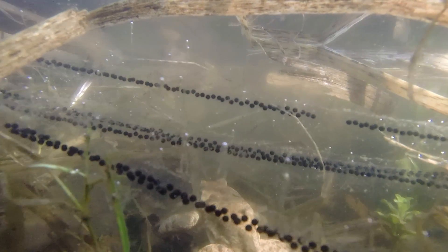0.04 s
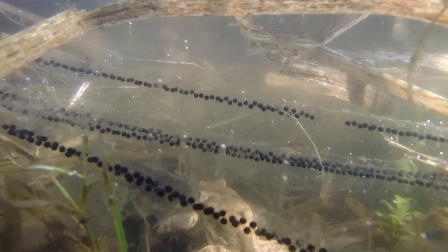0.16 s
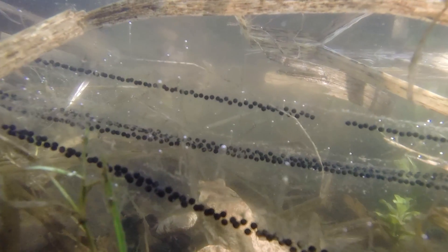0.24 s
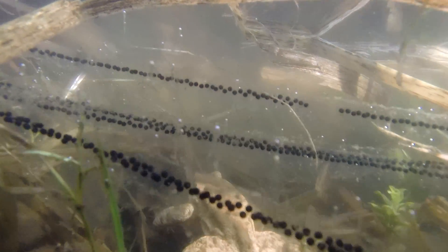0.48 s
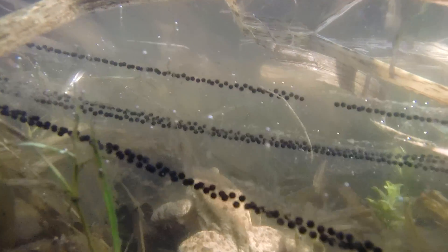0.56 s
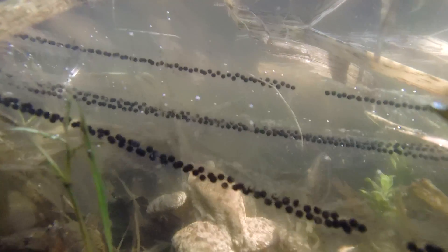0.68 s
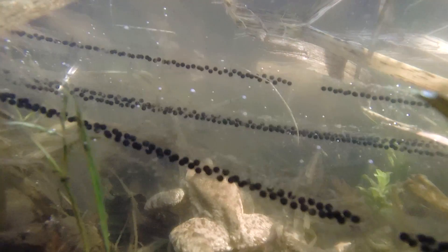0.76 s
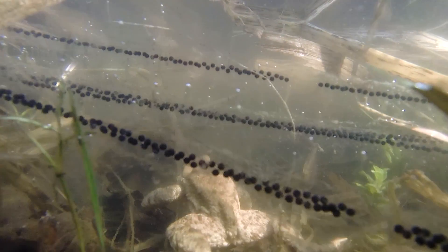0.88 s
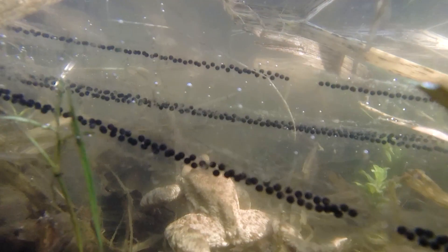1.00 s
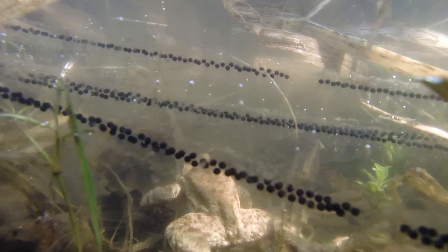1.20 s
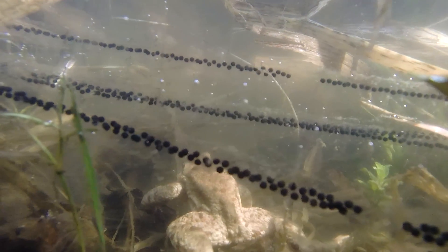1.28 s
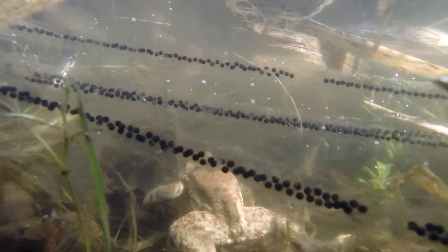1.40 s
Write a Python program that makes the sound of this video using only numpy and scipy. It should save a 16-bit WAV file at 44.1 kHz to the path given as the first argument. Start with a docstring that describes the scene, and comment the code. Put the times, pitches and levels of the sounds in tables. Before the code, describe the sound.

A toad calls twice, at about 0.2 and 0.6 seconds, the second slightly louder. Each call is a very short, clean, high note that opens with a soft pop and falls slightly. Steady hiss and an uneven low rumble continue throughout. Dull low bumps come near 0.45 and 1.2 seconds, a faint tick at 0.75, and soft, muffled swells of noise around 1.0 and 1.4.

```python
"""A toad at a pond

A toad calls twice over a steady hiss and an uneven low rumble. Each call starts with a soft pop
that rings the throat, then holds a clean falling note whose octave (twice the pitch) swells.
Two dull low bumps, a faint tick and soft swells of noise stir the background."""
import sys
import numpy as np
from scipy import signal
from scipy.fft import rfft, irfft
from scipy.io import wavfile

SR = 44100
rng = np.random.default_rng(int(sys.argv[2]) if len(sys.argv) > 2 else 0)


def dump_mix(stems):
    """Bounce the given channels to the path in sys.argv[1] as a 16-bit WAV at rate SR."""
    frames = np.atleast_2d(stems).T  # one column per channel
    limited = np.clip(frames, -1, 1)  # hard clip at full scale
    pcm = np.round(limited * 32767).astype(np.int16)
    wavfile.write(sys.argv[1], SR, pcm)


N = 63945


def amp(db):
    """Turns decibels into a number to multiply a sound by."""
    return 10 ** (np.asarray(db) / 20)


def unit(x):
    """Scales a signal so that its average strength (rms) is 1."""
    return x / np.sqrt(np.mean(x ** 2) + 1e-20)


def add(mix, start_s, sound):
    """Adds a sound to the mix at the given time."""
    part = mix[max(round(start_s * SR), 0):][:len(sound)]
    part += sound[:len(part)]


def noise(colour, low_hz=1):
    """Noise whose colour lists how strong each frequency is; it fades out below low_hz."""
    hz = np.fft.rfftfreq(N, 1 / SR)
    colour_hz, colour_db = np.transpose(colour)
    gain = amp(np.interp(np.log(hz + 1), np.log(colour_hz), colour_db))
    gain *= 1 - np.exp(-(hz / low_hz) ** 4)
    return unit(irfft(rfft(rng.standard_normal(N)) * gain, N))


def drift(rate_hz):
    """A smooth random wobble, up to about rate_hz times a second."""
    hz = np.fft.rfftfreq(N, 1 / SR)
    return unit(irfft(rfft(rng.standard_normal(N)) * np.exp(-(hz / rate_hz) ** 2), N))


def ring(t, hz, build_s):
    """The tone of something softly struck: it swells for build_s, then dies away."""
    rise = t / build_s
    return rise ** 2 * np.exp(2 * (1 - rise)) * np.sin(2 * np.pi * hz * t)


def hiss():
    """A steady hiss whose level flickers slightly."""
    # colour of the hiss (frequency [Hz], relative level [dB])
    colour = [(150, -1), (230, -2.5), (360, -7), (500, -8.5), (730, -11), (1000, -13), (2000, -17.5),
              (3700, -22), (5500, -26.5), (7800, -29.5), (10000, -35), (12500, -43), (15000, -64)]
    level_db = -46.5 + 0.41 * drift(rate_hz=36)
    return amp(level_db) * noise(colour, low_hz=134.6)


def rumble():
    """An uneven low rumble that slowly gets quieter."""
    # colour of the rumble (frequency [Hz], relative level [dB])
    colour = [(5, -15), (20, 3.5), (38, 3), (55, 0), (75, -2), (105, -4.5), (160, -10.5), (260, -47)]
    t = np.arange(N) / SR
    fade_db_per_s = 0.5
    level_db = -43.5 - fade_db_per_s * (t - t.mean()) + 0.14 * drift(rate_hz=16)
    return amp(level_db) * noise(colour)


def bumps():
    """Two dull bumps, each a low tone that swells and dies away."""
    # low bumps (start [s], level [dB], pitch [Hz], build-up [s])
    hits = [(0.447, -31.5, 73, 0.024), (1.174, -34.5, 38.7, 0.01)]
    out, t = np.zeros(N), np.arange(N) / SR
    for start, db, hz, build_s in hits:
        add(out, start, amp(db) * ring(t, hz, build_s))
    return out


def tick():
    """A faint tick: a tiny burst of bright noise."""
    # the burst (start [s], level [dB], fade time [s])
    bursts = [(0.7483, -47.5, 0.002)]
    # colour of the tick (frequency [Hz], relative level [dB])
    colour = [(500, -9), (2000, -9), (2800, 4), (4200, 0), (6000, -13), (8500, -14), (11400, -11),
              (12800, -34)]
    out, t = np.zeros(N), np.arange(N) / SR
    for start, db, fade_s in bursts:
        envelope = t / fade_s * np.exp(1 - t / fade_s)
        add(out, start, amp(db) * envelope * noise(colour))
    return out


def swells():
    """Soft, muffled noise that briefly rises and falls."""
    # swells of noise (time of peak [s], level [dB], width [s])
    peaks = [(1.01, -51, 0.052), (1.435, -58, 0.01)]
    # colour of the swells (frequency [Hz], relative level [dB])
    colour = [(70, -20), (150, -18), (400, 14), (650, 6), (1200, -13), (4000, -39)]
    out, t = np.zeros(N), np.arange(N) / SR
    for centre, db, width_s in peaks:
        out += amp(db) * np.exp(-((t - centre) / width_s) ** 2) * noise(colour)
    return out


def throat_pop():
    """A soft pop that makes the toad's throat ring at several pitches at once."""
    # tones of the throat (pitch [Hz], relative level [dB], build-up [s])
    tones = [(728, -7, 0.0024), (1011, -16, 0.0023), (1339, -4.5, 0.003), (1680, -4.5, .0031)]
    t = np.arange(SR // 10) / SR
    return sum(amp(db) * ring(t, hz, build_s) for hz, db, build_s in tones)


def note(hold_s, level_db, start_hz, settled_hz, octave_db):
    """A clean tone that sags in pitch while its energy moves into the octave above."""
    fade_in_s, fade_out_s = 0.0028, 0.0069
    slack_hz, slacken_s = 807, 0.0026
    t = np.arange(N) / SR
    progress = np.minimum(t / hold_s, 1)  # 0 to 1 while the note is held
    after_s = np.maximum(t - hold_s, 0)
    # the pitch falls quickly, levels off, then drops again as the pressure goes
    hz = settled_hz + (start_hz - settled_hz) * (1 - progress) ** 1.35
    hz = slack_hz + (hz - slack_hz) * np.exp(-after_s / slacken_s)
    hz *= 1 + 0.003 * drift(rate_hz=200)
    phase = 2 * np.pi * np.cumsum(hz) / SR
    fade_in = np.sin(np.pi / 2 * np.minimum(t / fade_in_s, 1)) ** 2
    fade_out = np.exp(-(after_s / fade_out_s) ** 1.66)
    base_tone = amp(-5 * progress ** 2) * np.cos(phase)  # loses 5 dB over the hold
    swell_db = -19 * np.maximum(1 - progress / 0.84, 0) ** 1.15  # full at 84% of the hold
    octave = amp(octave_db + swell_db) * np.cos(2 * phase)
    flicker_db = 0.3 * drift(rate_hz=200)
    return fade_in * fade_out * amp(level_db + flicker_db) * (base_tone + octave)


def toad():
    """Two calls, each a pop in the throat and then the note."""
    # the calls (start [s], hold [s], level [dB], starting pitch [Hz], settled pitch [Hz],
    # octave level relative to the note [dB], pop gain [dB])
    calls = [(0.2278, 0.042, -22.5, 947, 830.6, -1.2, -24), (0.6317, 0.046, -21, 939.3, 862.7, 0.3, -20)]
    pop_lead_s = 0.001676
    out, pop = np.zeros(N), throat_pop()
    for start, hold_s, level_db, start_hz, settled_hz, octave_db, pop_db in calls:
        add(out, start - pop_lead_s, amp(pop_db) * pop)
        add(out, start, note(hold_s, level_db, start_hz, settled_hz, octave_db))
    return out


def scene():
    """The toad in front of its background, in one channel."""
    return (toad() + hiss() + rumble() + bumps() + tick() + swells())[None]


def record(dry):
    """Cuts away the very highest treble."""
    cutoff_hz = 15100
    low_pass = signal.firwin(801, cutoff_hz, window=("kaiser", 9), fs=SR)
    return signal.oaconvolve(dry, low_pass[None], "same")


dry = scene()
out = record(dry)
dump_mix(out)
```